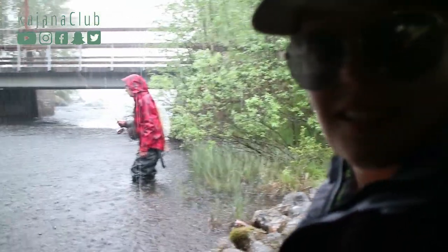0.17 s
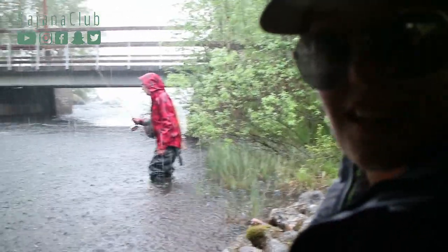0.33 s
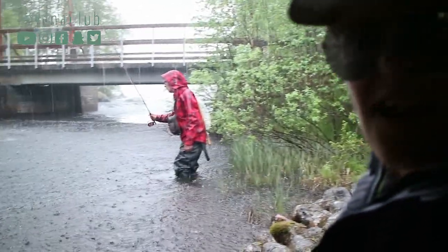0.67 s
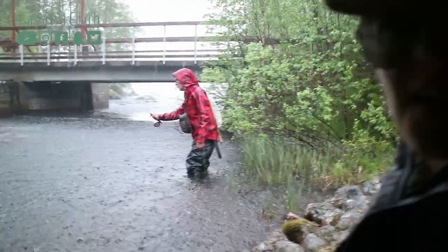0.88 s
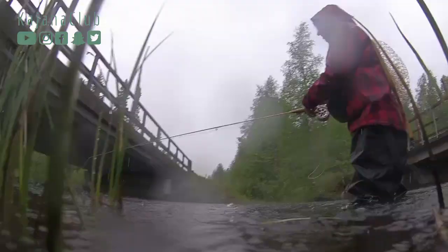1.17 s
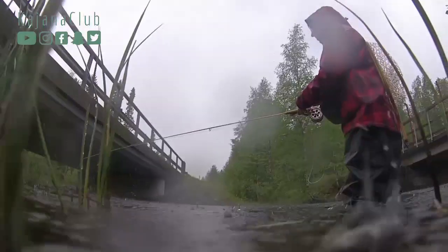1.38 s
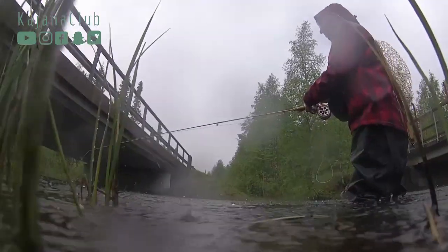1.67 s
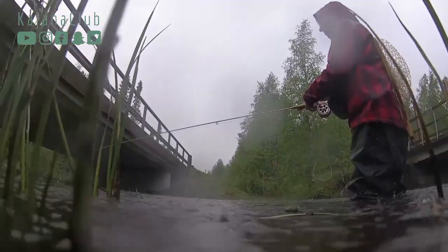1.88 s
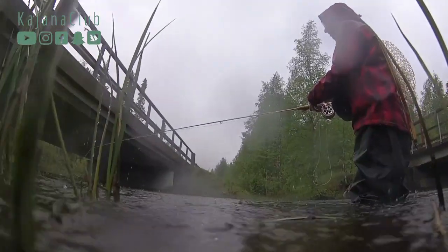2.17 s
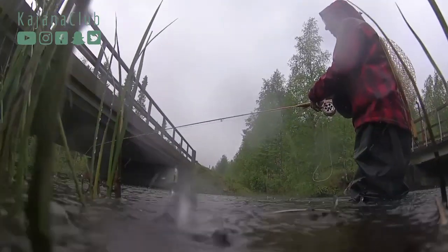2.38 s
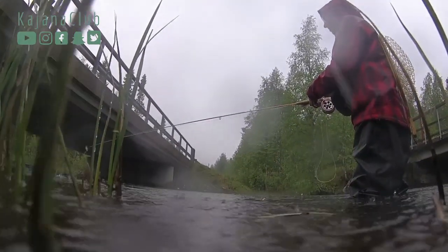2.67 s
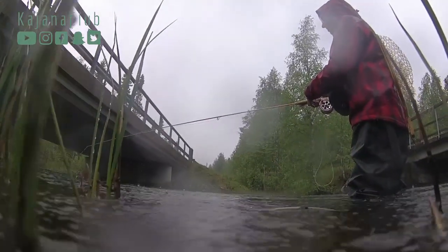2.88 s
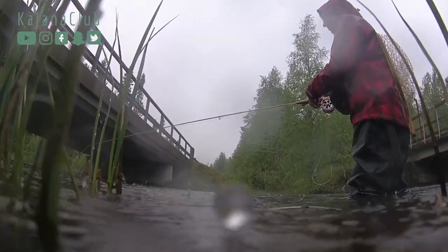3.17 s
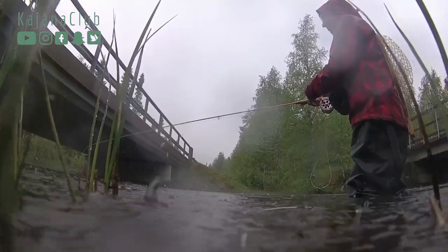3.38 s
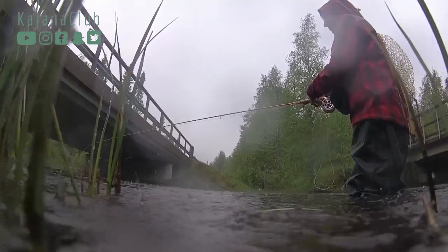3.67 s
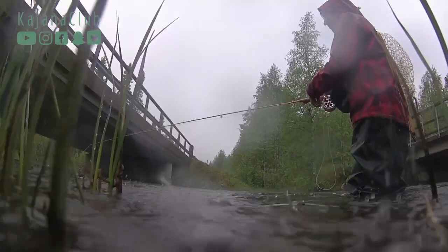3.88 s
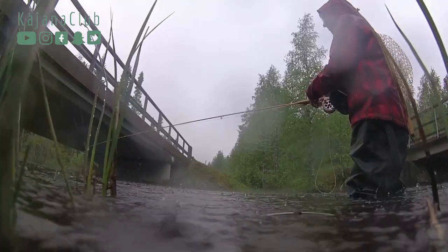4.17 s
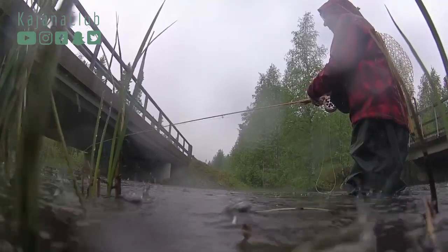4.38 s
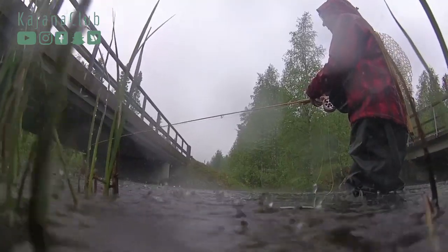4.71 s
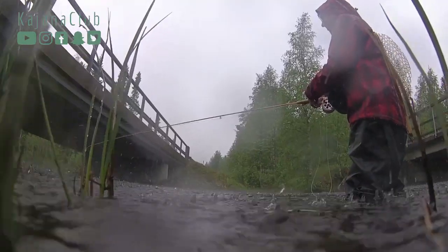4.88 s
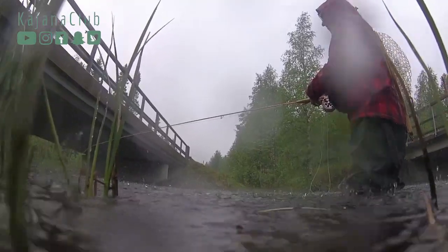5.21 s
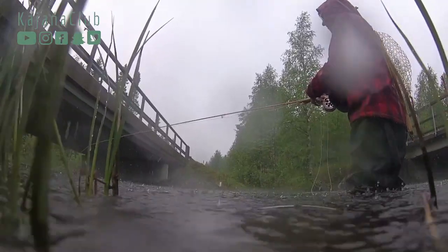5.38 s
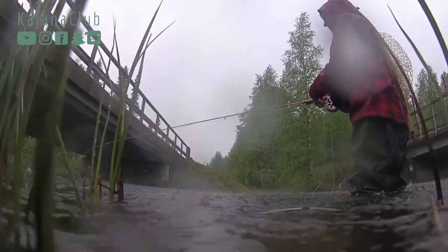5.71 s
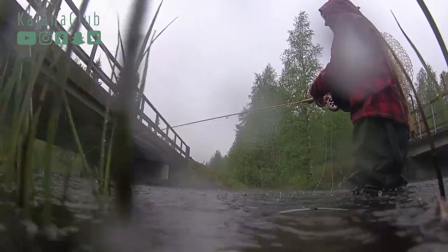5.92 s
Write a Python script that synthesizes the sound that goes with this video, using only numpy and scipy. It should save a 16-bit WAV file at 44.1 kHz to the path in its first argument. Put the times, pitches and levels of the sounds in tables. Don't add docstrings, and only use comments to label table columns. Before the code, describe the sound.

Heavy rain roars openly over river water for about a second, then cuts to faint muffled patter, hollow taps and low rumble inside a sealed housing.

```python
import sys
import numpy as np
from scipy import signal
from scipy.fft import rfft, irfft, next_fast_len
from scipy.io import wavfile
from scipy.ndimage import uniform_filter1d

SR = 44100
rng = np.random.default_rng(int(sys.argv[2]) if len(sys.argv) > 2 else 0)


def amplitude_ratio(level_db):
    exponent = np.asarray(level_db, float) / 20
    return 10 ** exponent


def bounce(signal):
    frames = np.transpose(np.atleast_2d(signal))
    limited = np.clip(frames, -1, 1)
    pcm = np.round(limited * 32767).astype(np.int16)
    wavfile.write(sys.argv[1], SR, pcm)


N = 266805
CUT_S, FADE_S = 1.2235, 0.012

# (time [s], level [dB])
BANK_RAIN = [(0, -27.5), (0.15, -26.5), (0.45, -23), (0.58, -25), (0.85, -23), (1.1, -22), (1.2, -23)]
# (frequency [Hz], level per Hz [dB])
BANK_HISS_TONE = [(180, -19), (300, -12.5), (462, -5), (537, -3.5), (828, -4), (1060, -0.5), (1320, -4),
                  (1610, -3.5), (6200, -7), (12500, -15), (16000, -24.5)]
# (frequency [Hz], level per Hz [dB])
BANK_WASH_TONE = [(13, -33.5), (22, -8), (103, 3), (139, 4), (324, -2), (450, -2), (580, -49), (990, -120)]
# (time [s], peak [dB], first pitch [Hz], last pitch [Hz], length [ms])
PLOPS = [(0.054, -19, 2020, 1800, 45), (.120, -16, 509.2, 625, 23), (0.193, -10.5, 1430, 1607, 15),
         (0.214, -27.5, 400, 489.6, 58), (.245, -15.5, 681, 910, 26), (0.399, -17.5, 510, 610, 34),
         (0.405, -15.5, 1529, 1740, 31), (.470, -20, 497, 540, 21.6), (.622, -18, 610, 527.4, 19),
         (.772, -13, 453.2, 703, 38), (.783, -14, 1600, 1687, 13), (.832, -23, 920, 1111, 28),
         (0.951, -20, 1228, 990, 28.42), (0.974, -12, 1058, 1270, 22.87), (1.010, -37, 620.1, 642.3, 22.27),
         (1.074, -15, 1610, 1789, 13), (1.113, -13, 1143, 1210, 20), (1.153, -11, 1318, 1448, 16.4)]
# (time [s], peak [dB], centre [Hz])
CLOTHING_TICKS = [(0.0336, -14.5, 3470), (0.1076, -18.5, 5000), (0.302, -14, 3613), (0.3774, -15.5, 5237),
                  (0.477, -15, 3202), (0.5462, -22, 3340), (0.605, -11.5, 5998), (0.7262, -19, 5150),
                  (0.8671, -8.5, 5700), (0.9123, -12.5, 3226), (0.9724, -17, 4793), (0.9956, -34, 6180),
                  (1.0203, -13.5, 3185), (1.159, -18, 4410), (1.1916, -11.5, 3153)]
# (time [s], peak [dB], pitch [Hz], length [ms])
COVER_THUMP = [
    (1.1215, -12, 140, 15),
]
# (time [s], peak [dB], centre [Hz], length [ms])
SPRAY_SNAPS = [(0.0707, -20, 7040, 3.5), (.486, -15, 4200, 6.0), (.6669, -13, 7040, 3.3),
               (.717, -16, 3100, 5.4), (.9985, -8.5, 6200, .6), (1.0316, -11, 7000, 7.0),
               (1.054, -20, 12500, 6.0), (1.0794, -14.5, 10500, 7.0), (1.1594, -9, 9500, 1.5),
               (1.2, -18, 12000, 7.5), (.368, -17, 1600, 6.7), (.43, -18, 2300, 6.0),
               (.458, -16, 1600, 6.0), (.675, -17.5, 2000, 7.0), (.71, -16.5, 1090, 8.4),
               (.985, -14, 1500, 6.6), (1.064, -14, 2000, 6.5)]
# (start [s], end [s], level [dB])
UNLIKE_TREBLE = (.742, .79, -32)

# (time [s], level [dB])
HOUSED_RAIN = [(1.27, -50), (1.45, -48), (1.9, -51), (2.1, -53), (2.5, -52.5), (2.65, -51.5), (2.82, -53.5),
               (3.05, -49), (3.25, -53), (3.58, -50), (3.93, -49.5), (4.25, -51), (4.45, -48.5),
               (4.62, -52), (5.2, -47), (5.45, -50.5), (5.75, -50.5), (5.9, -46)]
# (frequency [Hz], level per Hz [dB])
SHELL_TONE = [(290, -37), (500, -13), (668, -12), (1020, -5.5), (1220, -13), (1450, -6), (1680, -14),
              (2120, 1), (2410, 0.5), (3380, -13.5), (3770, -6), (4150, -11), (4700, -6.5), (5200, -5.5),
              (5550, -9.5), (5950, -9), (6410, -15.5), (9000, -19.5), (11700, -40), (19800, -120)]
# (frequency [Hz], level per Hz [dB])
TOP_TONE = [(3820, -7), (6500, -2), (14700, -9.5), (15600, -5), (15800, -20), (16000, -44)]
# (time [s], level [dB])
RIPPLES = [(1.27, -51), (2.3, -50.5), (2.5, -53), (3.0, -56), (3.4, -47.5), (3.93, -51), (4.25, -45),
           (4.6, -50), (5.3, -45.5), (5.57, -52.5), (5.72, -47), (6.04, -50.5)]
# (frequency [Hz], level per Hz [dB])
RUMBLE_TONE = [(13, -39), (22, -9), (48, -8.5), (75, -2.5), (140, -2.5), (202, -6.5), (258, -7),
               (487, -18.5), (700, -32), (910, -33), (1540, -120)]
# (time [s], peak [dB], pitch [Hz], length [ms])
KNOCKS = [(1.402, -31, 425.3, 4.3), (1.505, -26, 247.8, 3.18), (1.594, -24.5, 301, 2.29),
          (2.203, -36, 302.7, 5.8), (2.951, -15, 287.4, 2.593), (3.189, -34.5, 80.56, 19),
          (3.386, -31, 107, 16), (3.437, -20.5, 198.4, 2.8), (4.19, -33, 140.3, 20),
          (5.053, -31, 105, 10.51), (5.083, -28, 139.8, 8.7), (5.163, -31, 235.9, 15),
          (5.297, -26, 150, 11.7), (5.311, -29.5, 230, 9.0), (5.448, -29, 129, 18), (5.723, -27, 167.7, 11)]
# (centre [Hz], width [Hz], scatter between drops [octaves])
SHELL_ZONES = [
    (1000, 750, .04),
    (2200, 470, .025),
    (4850, 1300, .02),
    (8500, 5000, .06),
]
# (time [s], strength [dB], depth [dB], brightness [dB], edge [dB])
HARD_DROPS = [(1.4009, -26, -10.5, 2.5, -35), (1.5021, -30, 1, -0.5, -9), (1.6181, -33.5, 4, 6, -12.5),
              (2.2035, -35, -6.5, -25, 3), (2.4249, -34.5, -1, -2, -37), (2.6453, -49, 14.5, 1, -9),
              (2.7125, -41, -9.5, 0, -18.5), (2.9509, -23.5, -1.5, 2.5, -9.5), (3.105, -43, -5, -4.5, -28),
              (3.2674, -42, -10, 7, -26), (3.323, -30.5, 2.5, -2, -10.5), (3.42, -36.5, -4, -10.5, -19.5),
              (3.4362, -22.5, -8.5, -16, -21), (3.6224, -31, -6.5, -2, -14), (3.6916, -39, -9, -5, -35.5),
              (3.816, -30.5, -6.5, -11, -23), (3.9516, -40.5, -3, -7, -20), (4.191, -30, 3.5, -2, -11),
              (4.195, -32.5, -10, -9.5, -15), (4.3227, -31.5, -1.5, -2, -7),
              (4.5818, -44.5, 3.5, -11, -7.5), (4.6872, -34.5, -3.5, -14, -21.5),
              (5.2044, -41.5, 2.5, -7, -3), (5.3611, -27.5, 1, 5, -44)]
# (time [s], length [ms], strength [dB], depth [dB], brightness [dB])
SPLASHES = [(1.547, 5.6, -35.5, -1, -12), (1.5939, 7.1, -23, -11, -13.5), (1.93, 6.4, -42.5, -11, -1.5),
            (2.3987, 9.3, -37.5, -2.5, -11), (2.555, 6.8, -46.5, -16, -3.5), (2.987, 6.9, -40, -2, -12),
            (3.4777, 6.26, -31, -2, -8.5), (3.5752, 6.7, -42.5, -8, -7), (3.7526, 7.176, -55, 7.5, 10),
            (3.8282, 6.9, -39, -8, -17), (3.931, 6.8, -36, -33, -4), (3.9358, 6.9, -39, -18, -5),
            (4.5188, 6.2, -38.5, -27, -8), (4.7281, 6.935, -37, -7, -5), (5.266, 9.3, -41.5, 1, 0),
            (5.8935, 9.69, -39, -15, -3), (5.914, 9.2, -30, -18, -0.5), (5.9516, 12.753, -17, -31.5, -12),
            (5.97, 7, -53.5, 9, 15), (6.018, 7.2, -34, -30, -7)]
# (time [s], strength [dB], pitch [Hz])
SPECKS = [(1.282, -43, 3867), (1.6079, -43, 8246), (1.6307, -38.5, 8200), (1.651, -39, 5300),
          (1.7637, -42, 4844), (1.8152, -46, 1804), (2.141, -44, 1656), (2.2448, -40, 4729),
          (2.3597, -32.5, 1640), (2.3589, -38, 980), (2.403, -27, 3127), (2.421, -30, 1671),
          (2.4436, -45, 1122), (3.033, -41.5, 3724), (3.042, -35.5, 1720), (3.1954, -41.5, 1107),
          (3.403, -42.5, 1766), (3.4108, -41, 1713), (3.478, -47, 9327), (3.7109, -41, 2991),
          (4.006, -42, 4470), (4.2251, -41, 5890), (4.4366, -42, 4109), (4.574, -35, 4800),
          (4.7165, -31, 4680), (5.147, -36.5, 1662), (5.186, -39, 5400), (5.748, -41, 5232),
          (5.913, -36, 4914), (6.043, -36, 4846)]
# (time [s], strength [dB])
FACE_SPECKS = [(1.3227, -40), (1.8498, -45), (1.951, -41), (2.0186, -36), (2.1167, -47), (2.9189, -46),
               (2.9843, -37.5), (3.099, -37), (3.1315, -36), (3.5318, -41), (3.537, -36), (3.565, -38),
               (3.6036, -40.5), (3.8376, -42.5), (3.9207, -46), (4.0923, -42), (4.156, -42), (4.341, -42.5),
               (4.4168, -40), (4.4622, -33), (4.4845, -42), (4.509, -36), (4.588, -29), (4.6805, -39),
               (4.8062, -41.5), (5.012, -39.5), (5.0611, -41.5), (5.0888, -43), (5.8697, -35)]
# (time [s], peak [dB], pitch [Hz], width [Hz])
LENS_PING = [
    (4.4919, -4, 7320, 1087),
]
# (time [s], peak [dB], first pitch [Hz], last pitch [Hz], length [ms])
NEAR_PLOPS = [
    (4.228, -47.5, 999.1, 2201, 30),
    (4.600, -55, 876, 941.6, 19.76),
    (4.755, -47, 1835, 1912, 12),
    (5.295, -49, 501.9, 537.6, 25),
    (5.453, -49.5, 372, 405, 40),
]
# (time [s], peak [dB], pitch [Hz])
SPRAY_TAPS = [(1.256, -43, 4600), (1.3004, -40, 5240), (1.4872, -36, 6900), (1.5584, -43, 5310),
              (1.5665, -43, 10500), (1.6074, -33, 5200), (1.8003, -37, 5020), (1.8821, -42, 5500),
              (2.0009, -43, 4650), (2.157, -41, 4590), (2.1779, -34, 4530), (2.3067, -36, 5140),
              (2.5785, -42, 5210), (2.693, -45, 4660), (2.7342, -42, 5110), (2.8644, -47, 4580),
              (3.105, -36, 5190), (3.1104, -36, 5220), (3.1164, -34, 5290), (3.1204, -34, 5160),
              (3.1951, -44, 5250), (3.4244, -36, 7500), (3.463, -35, 5070), (3.6032, -38, 5100),
              (3.686, -35, 5170), (3.697, -37, 4800), (3.7117, -35, 5140), (3.87, -44, 7200),
              (3.901, -42, 5370), (3.9135, -39, 5000), (3.9853, -37, 3660), (4.0527, -35, 5130),
              (4.121, -41, 8440), (4.2193, -35, 5930), (4.2497, -39, 5130), (4.2677, -38, 4780),
              (4.4762, -41, 5500), (4.6758, -37, 4950), (4.7004, -33, 4900), (4.7934, -41, 4930),
              (4.9142, -39, 3740), (5.1514, -38, 6500), (5.3158, -31, 5540), (5.5298, -39, 5100),
              (5.5564, -42, 12500), (5.672, -41, 5600), (5.8691, -27, 5050), (5.9, -35, 5100),
              (5.975, -32, 5200),
              (1.492, -38, 2400), (1.763, -42, 1200), (1.918, -43, 2070), (2.245, -41, 2440),
             (2.385, -42, 1200), (2.579, -38, 1690), (2.592, -45, 1100), (2.671, -46, 1700),
             (2.697, -45, 1600), (2.865, -39, 2090), (2.991, -34, 1500), (3.068, -39, 1490),
             (3.11, -36, 2370), (3.116, -32, 2310), (3.12, -29, 2340), (3.293, -42, 1300),
             (3.384, -43, 1500), (3.678, -41, 1300), (3.886, -41, 1500), (3.942, -35, 2400),
             (4.342, -41, 1300), (4.37, -39, 2380), (4.475, -39, 1200), (4.545, -44, 2410),
             (4.697, -31, 1800), (4.844, -36, 2460), (4.929, -42, 2510), (4.954, -39, 2230),
             (5.125, -36, 2300), (5.17, -34, 2210), (5.401, -42, 1800), (5.723, -38, 2340),
             (5.763, -36, 2450)]
# (start [s], end [s], level [dB])
BRUSHES = [
    (1.31, 1.426, -53.5),
    (3.096, 3.125, -45.5),
    (3.691, 3.709, -43.5),
    (3.926, 3.951, -47),
    (4.68, 4.741, -48.5),
    (5.53, 5.654, -48.5),
    (5.84, 6.098, -47.5),
]
# (centre [Hz], width [Hz], level [dB])
BRUSH_BANDS = [
    (1380, 170, -9),
    (2439.7, 220, 2),
    (3250, 156.2, -5.5),
    (5100, 610, -1.5),
    (4200, 1500, -8),
    (8530, 4360, -18),
]


def rms_one(x):
    return x / np.sqrt(np.mean(x ** 2) + 1e-20)


def in_time(rows):
    s, *columns = np.transpose(rows)
    return [np.interp(np.arange(N) / SR, s, c) for c in columns]


def drift(rate):
    r = np.exp(-80 * np.pi * rate / SR)
    slow = signal.lfilter([1], [1, -2 * r, r * r], rng.standard_normal(N // 40 + 2002))[2000:]
    return np.interp(np.arange(N) / 40, np.arange(len(slow)), rms_one(slow))


def resonate(x, hz, width_hz):
    r = np.exp(-np.pi * width_hz / SR)
    feedback = [1, -2 * r * np.cos(2 * np.pi * hz / SR), r * r]
    return signal.lfilter([(1 - r * r) / 2, 0, (r * r - 1) / 2], feedback, x)


def add(out, s, piece):
    i = round(s * SR)
    out[i:i + len(piece)] += piece[:N - i]


def coloured(x, spectrum, patchy_db, rate):
    size = next_fast_len(N)
    octave = np.log2(np.arange(size // 2 + 1) * SR / size + 1)
    hz, level_db = np.transpose(spectrum)
    shaped = rfft(x, size) * amplitude_ratio(np.interp(octave, np.log2(hz), level_db, left=-90, right=-90))
    out, together = 0, drift(rate)
    step = 0.7
    for centre in np.arange(np.log2(hz[0]), np.log2(hz[-1]) + step, step):
        window = np.maximum(1 - np.abs(octave - centre) / step, 0)
        band = irfft(shaped * window, size)[:N]
        out = out + band * amplitude_ratio(patchy_db * (0.63 * together + drift(3 * rate)))
    return rms_one(out)


def patter(per_s, spread_db, burst_ms, share):
    sizes = amplitude_ratio(spread_db * np.minimum(rng.exponential(1, N), 3.5))
    born = (rng.random(N) < per_s / SR) * sizes
    r = np.exp(-1000 / (burst_ms * SR))
    bursts = signal.lfilter([1], [1, -r], born + 1e-18) * rng.standard_normal(N)
    share = np.clip(share, 0, 1)
    return np.sqrt(share) * rms_one(bursts) + np.sqrt(1 - share) * rng.standard_normal(N)


def bubble(first_hz, last_hz, ms):
    along = np.linspace(0, 1, int(ms * SR / 1000))
    phase = 2 * np.pi * np.cumsum(first_hz * (last_hz / first_hz) ** along) / SR
    return np.sin(phase) * np.sin(np.pi * along ** 0.76)


def push(hz, ms):
    t = np.arange(int(ms * SR / 1000)) / SR
    swell = np.abs(np.sin(np.pi * t / t[-1])) ** 1.53
    return -np.sin(2 * np.pi * hz * t) * swell


def strike(burst, db, hz, width_hz):
    ring = resonate(resonate(burst, hz, width_hz), hz, 2.52 * width_hz)
    return amplitude_ratio(db) * ring * np.sqrt(0.004 * SR / np.sum(ring ** 2))


def bass_side(lows, own, level_db, lean):
    leaning = signal.sosfilt(signal.butter(2, 130, fs=SR, output="sos"), lows)
    return amplitude_ratio(level_db) * own + lean * leaning


def unlike_treble():
    start, end, db = UNLIKE_TREBLE
    band = signal.butter(6, [9000, 14000], "band", fs=SR, output="sos")
    gap = signal.butter(4, [10500, 11800], "bandstop", fs=SR, output="sos")
    treble = signal.sosfilt(gap, signal.sosfilt(band, rng.standard_normal(N)))
    along = np.clip((np.arange(N) / SR - start) / (end - start), 0, 1)
    return amplitude_ratio(db) * treble * np.sin(np.pi * along)


def ripple_rumble():
    rumble_db, = in_time(RIPPLES)
    rumble = amplitude_ratio(rumble_db - 0.8) * coloured(rng.standard_normal(N), RUMBLE_TONE, patchy_db=2.0, rate=7)
    knocks = np.zeros(N)
    for s, db, hz, ms in KNOCKS:
        add(knocks, s, amplitude_ratio(db - 4.5) * push(hz, ms))
    return rumble + knocks


def reed_rustle():
    friction, t = patter(600, 3.396, 1.9, 0.66), np.arange(N) / SR
    bands, touch = np.zeros(N), np.zeros(N)
    for hz, width_hz, db in BRUSH_BANDS:
        ring = resonate(resonate(friction, hz, width_hz), hz, 3 * width_hz)
        bands += amplitude_ratio(db) * rms_one(ring)
    for start, end, db in BRUSHES:
        away_db = 43 * np.maximum(start - t, 0) + 73 * np.maximum(t - end, 0)
        touch += amplitude_ratio(db - away_db / (end - start))
    return touch * rms_one(bands)


def spray_taps():
    out, t = np.zeros(N), np.arange(500) / SR
    for s, db, hz in SPRAY_TAPS:
        burst = rng.standard_normal(500) * np.exp(-t / 0.0011)
        spot = resonate(resonate(burst, hz, 0.13 * hz), hz, 0.41 * hz)
        edge = resonate(resonate(burst, 1.05 * hz, 1.0 * hz), 1.05 * hz, 1.9 * hz)
        tap = rms_one(spot) + 0.18 * rms_one(edge)
        add(out, s, amplitude_ratio(db - 5.0) * tap / np.abs(tap).max())
    return out


def spray_snaps():
    out, t = np.zeros(N), np.arange(900) / SR
    for s, db, hz, ms in SPRAY_SNAPS:
        burst = rng.standard_normal(900) * t * np.exp(-2500 * t / ms)
        snap = resonate(resonate(burst, hz, 0.45 * hz), hz, 0.96 * hz)
        add(out, s, amplitude_ratio(db) * snap / np.abs(snap).max())
    return out


def clothing_and_cover():
    out, t = np.zeros(N), np.arange(600) / SR
    for s, db, hz in CLOTHING_TICKS:
        tick = resonate(rng.standard_normal(600) * np.exp(-t / 0.013), 0.95 * hz, 2900)
        add(out, s, amplitude_ratio(db + 1.5) * tick / np.abs(tick).max())
    for s, db, hz, ms in COVER_THUMP:
        add(out, s, amplitude_ratio(db) * push(hz, ms))
    return out


def large_plops():
    out = np.zeros(N)
    for s, db, *shape in PLOPS:
        plop = bubble(*shape)
        spray = uniform_filter1d(rng.standard_normal(len(plop)), size=40) * np.sqrt(40)
        add(out, s, amplitude_ratio(db - 8.0) * plop * (1 + 0.46 * spray))
    return out


def bubble_carpet():
    out = np.zeros(N)
    for when, pitch, size, rise in rng.random((420, 4)):
        hz = 480 * 5.5 ** pitch
        ring = bubble(hz, hz * (1 + 0.33 * rise), 13000 / hz)
        add(out, when * CUT_S, amplitude_ratio(10.5 * size ** 2) * ring)
    return out


def near_plops():
    out = np.zeros(N)
    for s, db, *shape in NEAR_PLOPS:
        add(out, s, amplitude_ratio(db) * bubble(*shape))
    return out


def lens_ping():
    out, t = np.zeros(N), np.arange(1300) / SR
    for s, db, hz, width_hz in LENS_PING:
        touch = signal.unit_impulse(1300) + 0.49 * signal.unit_impulse(1300, idx=52)
        ring = resonate(resonate(resonate(touch, hz, width_hz), hz, 2.1 * width_hz), hz, 3 * width_hz)
        ring = signal.sosfilt(signal.butter(4, 9500, fs=SR, output="sos"), ring)
        splash = resonate(rng.standard_normal(1300) * np.exp(-t / 0.0019), 3400, 2531)
        add(out, s, amplitude_ratio(db) * (ring / np.abs(ring).max() + 0.1989 * splash))
    return out


def small_drops():
    out, t = np.zeros(N), np.arange(1300) / SR
    face = [(s, db, 2330 * 2 ** (0.043 * rng.standard_normal())) for s, db in FACE_SPECKS]
    for s, db, hz in SPECKS + face:
        burst = rng.standard_normal(1300) * np.exp(-t / 0.0017)
        spot = strike(burst, db - 5.0, hz, 250 + 0.082 * hz)
        add(out, s, spot + strike(burst, db - 24.0, 2163, 2600))
    return out


def hard_drops():
    out, t = np.zeros(N), np.arange(1300) / SR
    hits = [(s, 2.35, *colour) for s, *colour in HARD_DROPS]
    hits += [(*row, -15.5) for row in SPLASHES]
    for s, ms, strength_db, depth_db, bright_db, edge_db in hits:
        strengths = strength_db + np.array([depth_db, 0, bright_db, bright_db + edge_db])
        length = max(ms - 1.2, 0.6) / 1000
        long_splash = ms > 7
        if long_splash:
            lumps = amplitude_ratio(0.95 * np.sin(2 * np.pi * 210 * t))
            shape = np.sin(np.pi * np.minimum(t / (1.51 * length), 1)) ** 2 * lumps
        else:
            rise = 1 - np.exp(-t / (0.094 * length))
            fall = np.exp(-(t / (0.43 * length)) ** 1.1) + 0.082 * np.exp(-t / 0.003)
            shape = rise * fall
        splash = rng.standard_normal((4, 1300)) * shape
        lag = round(rng.uniform(25, 70))
        splash[:, lag:] -= 0.41 * splash[:, :-lag].copy()
        offs = np.clip(rng.standard_normal(4), -2, 2)
        for burst, db, (hz, width_hz, scatter), off in zip(splash, strengths, SHELL_ZONES, offs):
            width = width_hz * (0.55 if long_splash else 1)
            add(out, s, strike(burst, db, hz * 2 ** (scatter * off), width))
        add(out, s, strike(splash[1], strength_db - 16, 2294, 62))
    return out


def rain_through_shell():
    rain_db, = in_time(HOUSED_RAIN)
    rain = coloured(patter(480, 4.1, 0.9, 0.66), SHELL_TONE, patchy_db=1.43, rate=11.4)
    top = coloured(patter(180, 3.59, 1.208, 0.1335), TOP_TONE, patchy_db=-0.5, rate=6.475)
    top_db = -65 + 0.11 * (rain_db + 54.0)
    return amplitude_ratio(rain_db - 2.1) * rain + amplitude_ratio(top_db) * top


def rain_on_river():
    rain_db, = in_time(BANK_RAIN)
    quietest_db = rain_db.min()
    wash_db = quietest_db + 0.24 * (rain_db - quietest_db) - 15
    hiss = coloured(patter(600, 3.7, 1.8, 0.36), BANK_HISS_TONE, patchy_db=0.6, rate=12)
    wash = coloured(rng.standard_normal(N), BANK_WASH_TONE, patchy_db=1.0, rate=6.52)
    return amplitude_ratio(rain_db + 1.5) * hiss + amplitude_ratio(wash_db + 1.0) * wash + amplitude_ratio(rain_db - 16) * bubble_carpet()


def scene():
    t = np.arange(N) / SR
    first = np.clip((CUT_S - t) / FADE_S, 0, 1)
    second = np.clip((t - CUT_S + FADE_S) / FADE_S, 0, 1)
    bank = rain_on_river() + large_plops() + clothing_and_cover()
    shell = rain_through_shell() + hard_drops() + small_drops() + lens_ping() + near_plops()
    shell += reed_rustle() + spray_taps()
    lows = ripple_rumble()
    mid = first * (bank + spray_snaps()) + second * (shell + lows)
    own = coloured(rng.standard_normal(N), RUMBLE_TONE, patchy_db=1.5, rate=6.925)
    ripple_db, = in_time(RIPPLES)
    side = first * bass_side(bank, own, -57.5, 0.08)
    side += second * bass_side(lows, own, ripple_db - 17.5, 0.18)
    side += unlike_treble()
    return np.array([mid + side, mid - side])


def band_limit(x):
    return signal.sosfilt(signal.butter(12, 16670, fs=SR, output="sos"), x)


def record(dry):
    rounded = 0.8 * np.tanh(dry / 0.8)
    finished = signal.sosfilt(signal.cheby2(10, 50, 16500, fs=SR, output="sos"), rounded)
    return band_limit(finished)


dry = scene()
out = record(dry)
bounce(out)
```